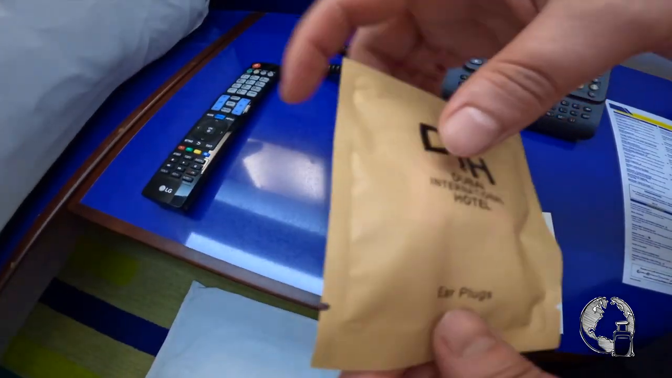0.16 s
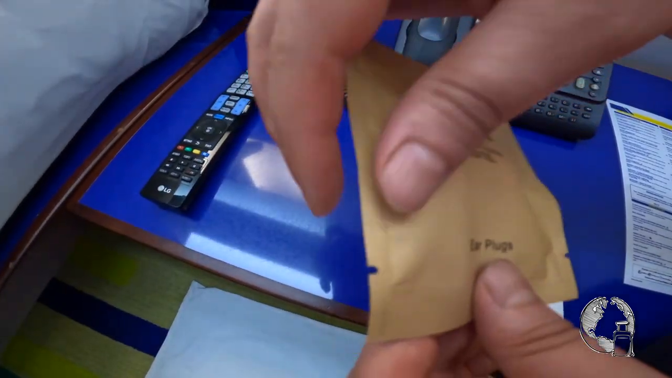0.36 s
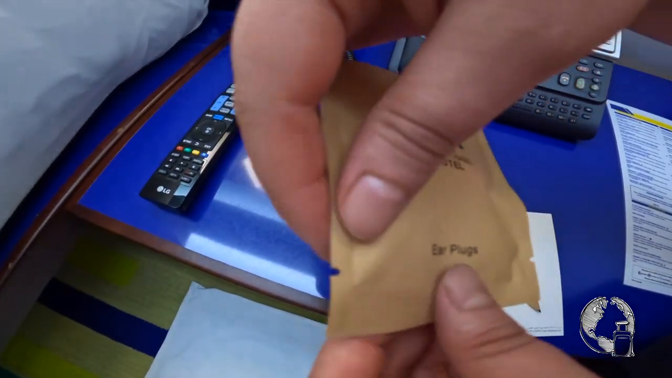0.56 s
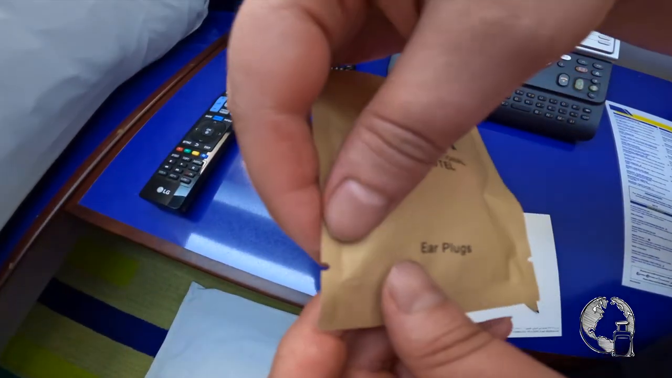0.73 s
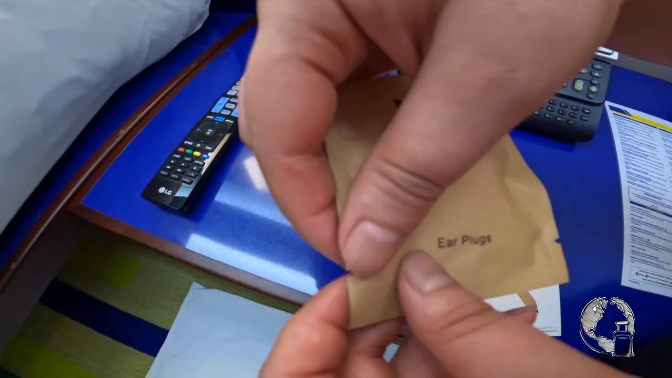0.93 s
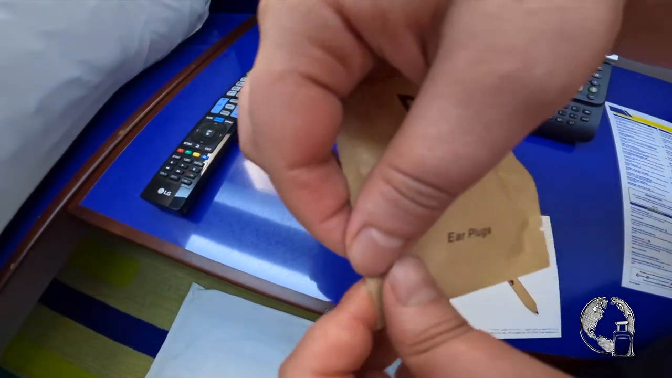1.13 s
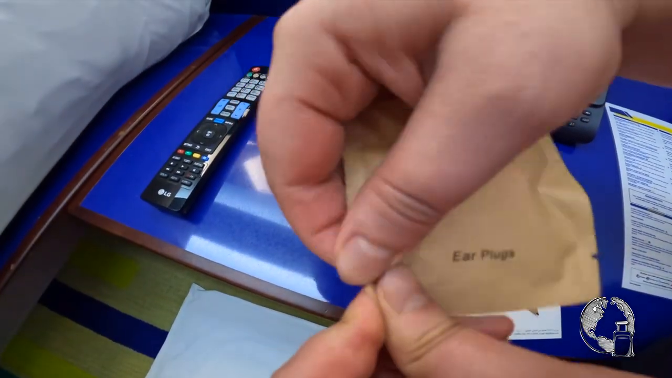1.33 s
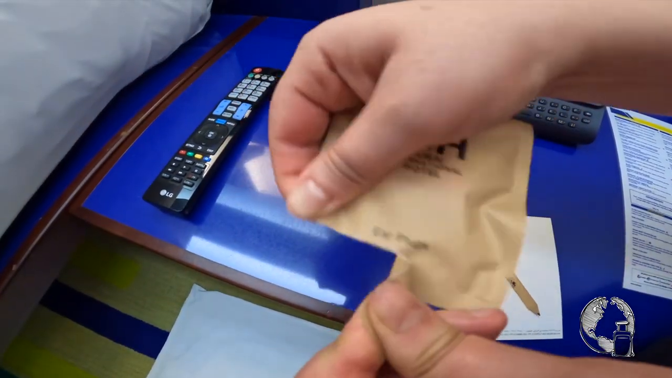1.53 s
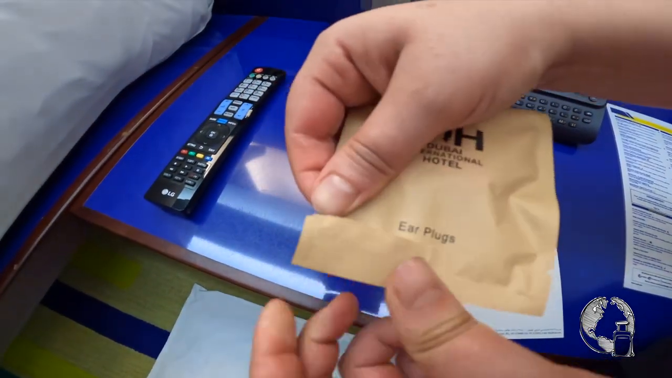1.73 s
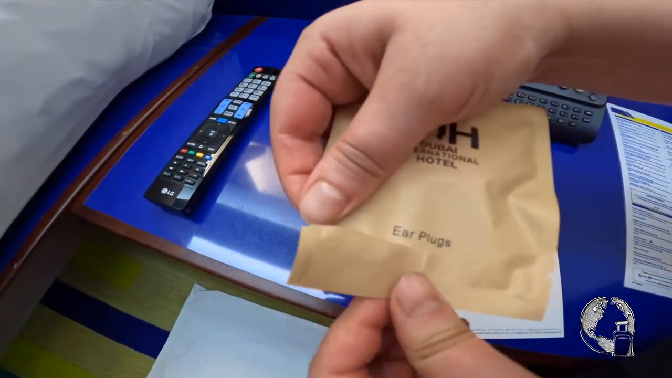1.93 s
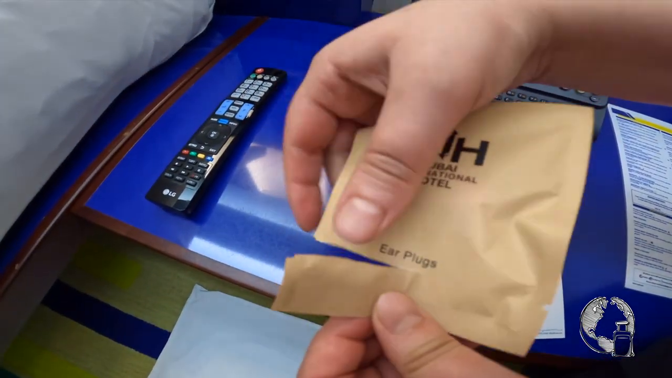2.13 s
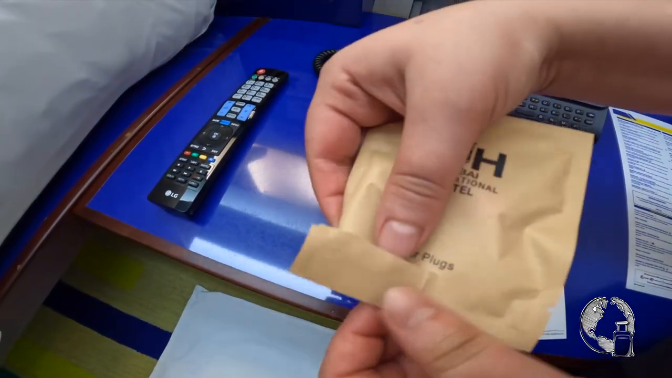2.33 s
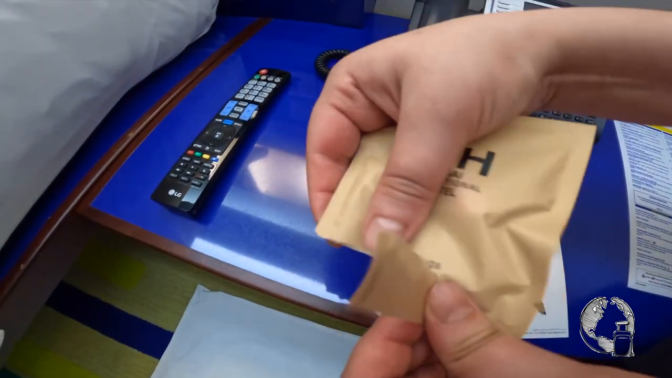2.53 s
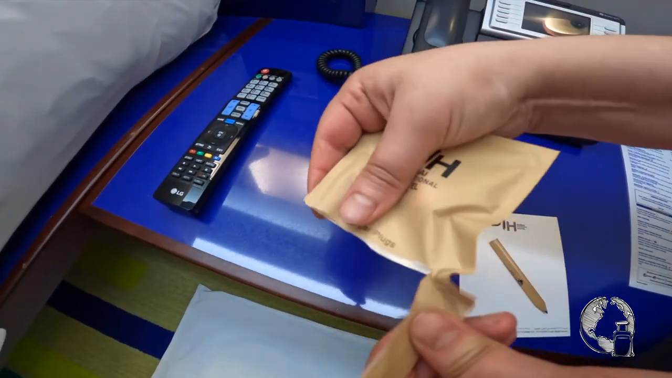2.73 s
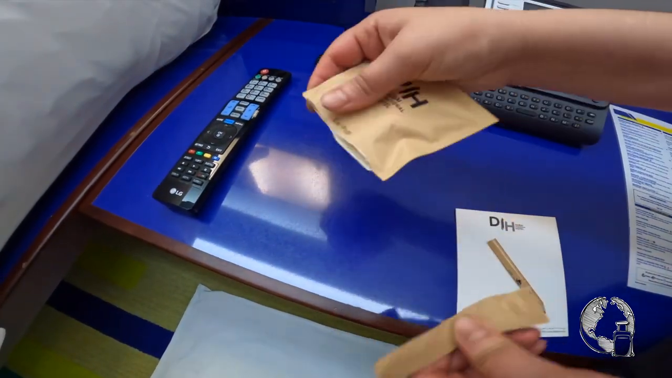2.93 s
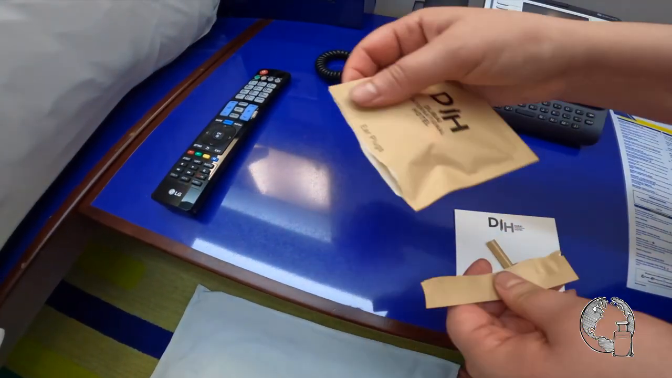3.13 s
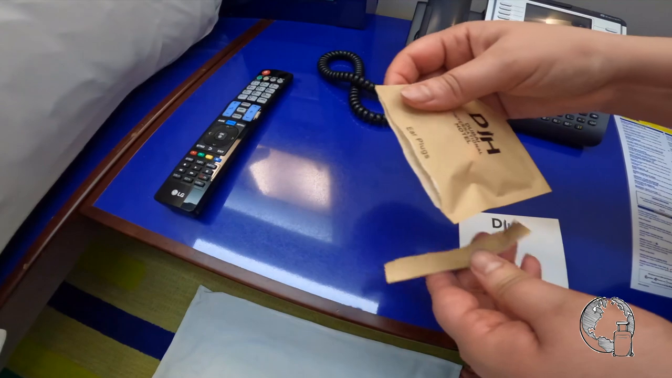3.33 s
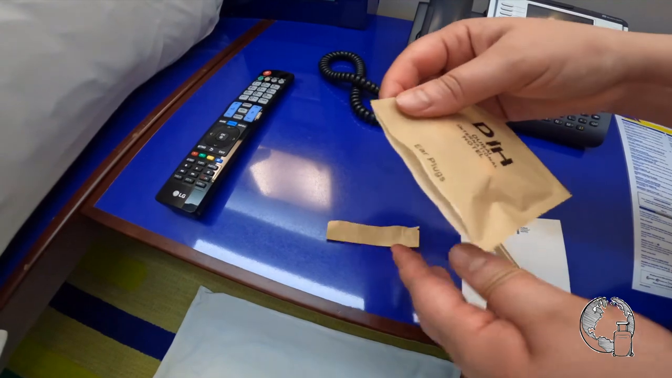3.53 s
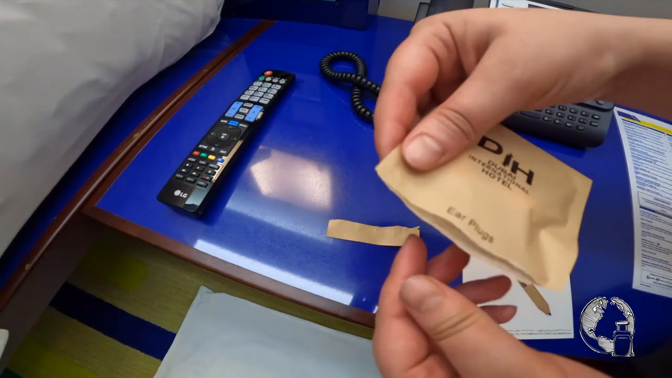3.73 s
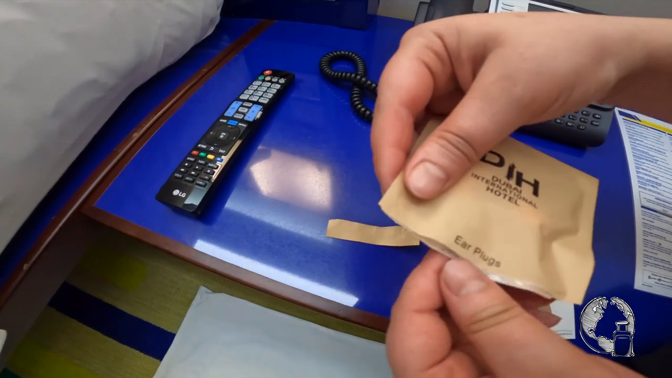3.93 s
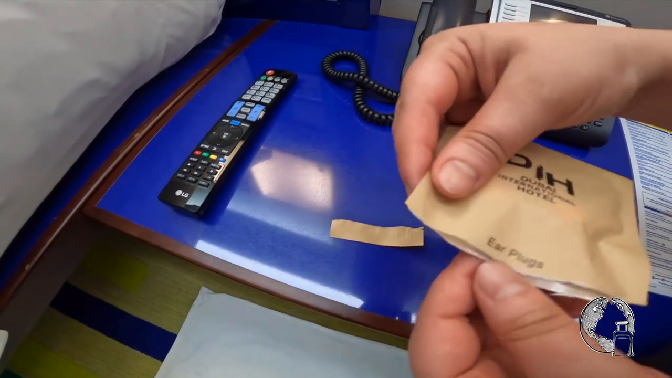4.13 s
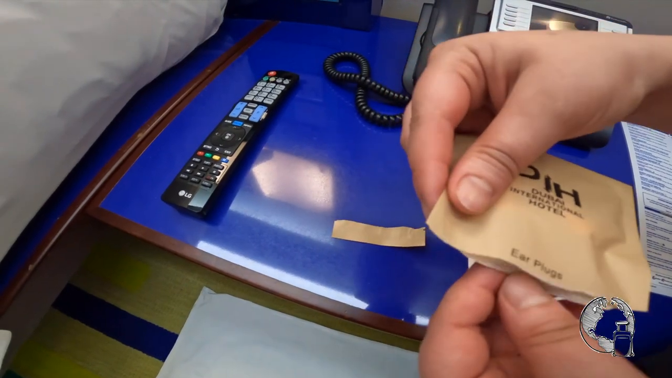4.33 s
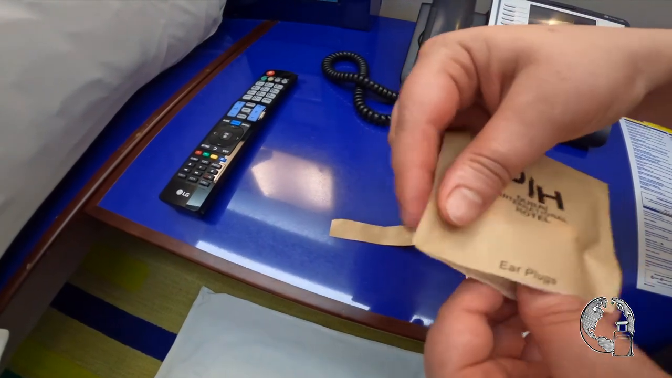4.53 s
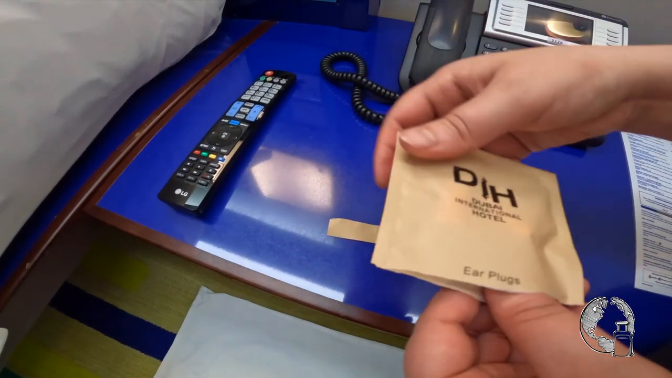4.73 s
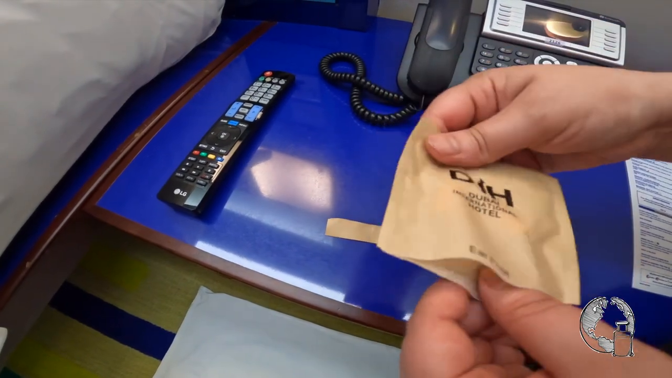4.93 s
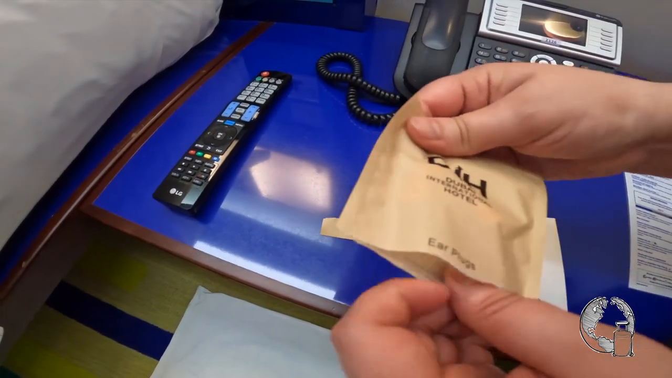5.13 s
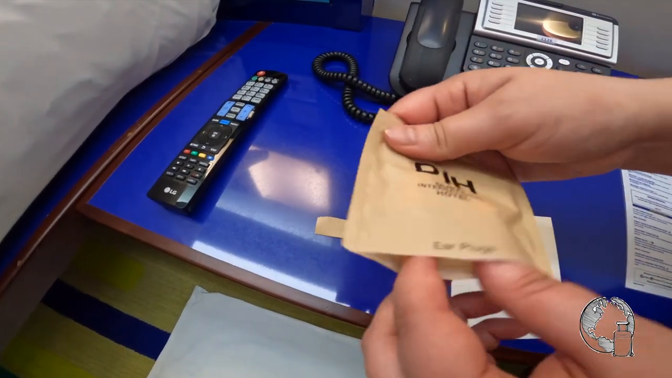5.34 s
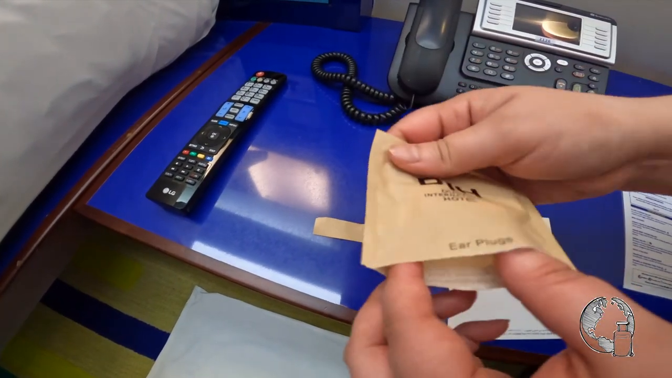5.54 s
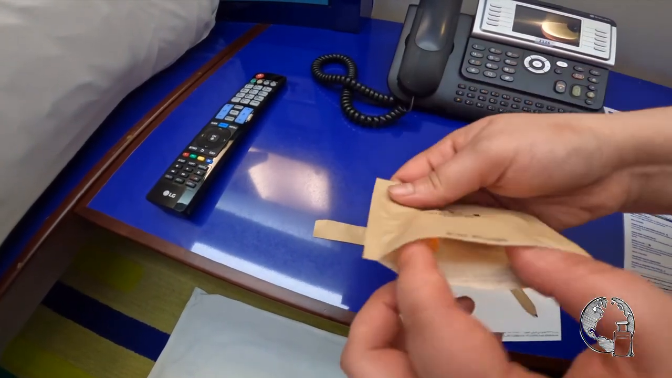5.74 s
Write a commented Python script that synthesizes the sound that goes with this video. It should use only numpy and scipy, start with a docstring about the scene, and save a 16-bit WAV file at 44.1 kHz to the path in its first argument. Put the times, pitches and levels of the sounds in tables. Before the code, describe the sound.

A small stiff paper sachet is handled very close to the microphones. Sparse sharp crinkles come first, then a brisk short rip, a cluster of crackles, and another quick two-part tear. Lighter rubbing and isolated snaps follow, with a denser burst as the opening is pried apart. The room is soft, quiet and nearly dry, with a low ventilation rumble.

```python
"""Stiff paper snaps sharply and rasps as hands pinch, tear and prise open a small sachet close by.
Snaps are noise-driven facets with ringing modes; tearing and sliding are dense streams of tiny clicks.
The pouch puffs air as damped swings of falling pitch; runs of fine creases crackle.
Desk and wall reflections and the low filtered-noise rumble of a quiet, softly furnished room lie behind."""
import sys
import numpy as np
from scipy import signal
from scipy.fft import rfft, irfft, next_fast_len
from scipy.io import wavfile

SR = 44100
rng = np.random.default_rng(int(sys.argv[2]) if len(sys.argv) > 2 else 0)


def put_to_file(sound):
    """Save the sound as 16-bit audio at rate SR, in the file named by the first command-line argument."""
    columns = np.atleast_2d(sound).T  # one column per channel
    safe = np.clip(columns, -1, 1)
    whole_steps = np.round(safe * 32767)
    wavfile.write(sys.argv[1], SR, whole_steps.astype(np.int16))


N = 258867

TAPS = 2048
LEAD = TAPS // 10  # samples of creak before a facet flips
HZ = np.fft.rfftfreq(TAPS, 1 / SR) + 1  # offset keeps logs and ratios finite
LOWEST_HZ = 471  # reference lowest mode of a facet
HOLD_DB = -80  # creep of fingers that only hold the paper

# Pulls that tear the paper or peel the lips of the pouch apart. Each row: start in seconds, length in
# seconds, onset level in dB, speed (1 is a brisk rip), ring of the taut paper in Hz.
PULLS = [(1.565, 0.11, -41.5, 0.78, 4450), (1.796, 0.018, -52, 0.15, 490),
         (2.648, 0.043, -39.5, 0.89, 1750), (2.853, 0.027, -43, 0.66, 1150)]
# Strokes of skin over paper. Each row: start in seconds, length in seconds, onset level in dB,
# ring of the patch under the finger in Hz.
STROKES = [(0, 0.017, -65, 6650), (0.092, 0.11, -71, 4000), (0.478, 0.041, -66, 6600),
           (0.65, 0.039, -70, 6060), (0.716, 0.15, -66, 5900), (0.903, 0.087, -68.5, 2980),
           (1.081, 0.061, -65, 6500), (1.382, 0.3, -62, 4500), (2.118, 0.016, -58, 3200),
           (2.363, 0.046, -62, 2470), (2.494, 0.094, -62, 2790), (2.72, 0.016, -68.5, 4000),
           (2.838, 0.33, -68, 2720), (3.446, 0.12, -69.5, 2940), (3.852, 0.02, -70.5, 3400),
           (4.174, 0.14, -71, 3200), (4.465, 0.065, -67, 5640), (4.539, 0.024, -63, 5800),
           (4.615, 0.087, -60, 2560), (4.861, 0.066, -73, 7000), (4.995, 0.14, -63.5, 3000),
           (5.28, 0.15, -70.5, 4300), (5.431, 0.08, -62.5, 2520), (5.62, 0.37, -72, 3430)]


def from_db(db):
    """Decibels to amplitude."""
    return 10 ** (np.asarray(db) / 20)


def unit(x):
    """Scales to rms 1."""
    return x / np.sqrt(np.mean(x ** 2) + 1e-20)


def read(points, hz):
    """Interpolates a curve on a log-frequency axis."""
    point_hz, value = np.transpose(points)
    return np.interp(np.log(hz + 1), np.log(point_hz), value)


def add(mix, start_s, sound):
    """Adds a sound in place, cut off at the end of the mix."""
    part = mix[max(round(start_s * SR), 0):][:len(sound)]
    part += sound[:len(part)]


def click(gain):
    """Minimum-phase pulse: the sharpest causal pulse with this spectrum, energy 1."""
    log_gain = np.log(np.maximum(gain / gain.max(), 1e-5))
    circle = np.r_[log_gain, log_gain[-2:0:-1]]
    pulse = np.fft.ifft(np.exp(np.conj(signal.hilbert(circle)))).real
    return pulse / np.linalg.norm(pulse)


def mode(hz, sharpness, lift_db):
    """Spectrum of one resonance standing out of a flat floor."""
    detuning = sharpness * (HZ / hz - hz / HZ)
    return np.sqrt(1 + from_db(lift_db) ** 2 / (1 + detuning ** 2))


def resonate(x, hz, width_hz):
    """Resonance of gain 1 that follows the curve hz: shift to 0 Hz, smooth, shift back."""
    turn = np.exp(2j * np.pi * np.cumsum(hz) / SR)
    pole = np.exp(-np.pi * width_hz / SR)
    return 2 * (turn * signal.lfilter([1 - pole], [1, -pole], x / turn)).real


def flutter(per_s):
    """Smooth chance, rms 1, no faster than the given rate."""
    knots = rng.standard_normal(int(2 * per_s * N / SR) + 2)
    return unit(signal.resample(knots, next_fast_len(N))[:N])


def gesture(start_s, length_s, level_db, rise, sag, fall):
    """Gain of one hand movement: sets in, sags while it lasts, dies away; rates in dB per second."""
    t = np.arange(N) / SR - start_s
    rise_db = rise * np.minimum(t, 0)
    sag_db = sag * np.clip(t, 0, length_s)
    fall_db = fall * np.maximum(t - length_s, 0)
    return from_db(level_db + rise_db - sag_db - fall_db)


def facet(lowest_hz, ring_hz, crispness, decay_ms, scatter=1.19, creak_s=0.00041):
    """A facet creaks and flips, then bending waves rattle between creases; weak below its lowest mode."""
    # Snap spectrum. Each row: frequency in Hz, level in dB per Hz.
    snap_spectrum = [(400, -2), (800, -2), (1600, -3.5), (3100, -5), (6200, -7.5), (8200, -19.5),
                     (10500, -18.5), (14000, -30)]
    t = (np.arange(TAPS) - LEAD) / SR
    envelope = np.exp(np.minimum(t / creak_s, -t * 10 ** 3 / max(decay_ms, .5)))
    rattle = rng.standard_normal(TAPS) * envelope
    drive = scatter * rattle / np.linalg.norm(rattle)
    drive[LEAD] = rng.choice([-1, 1])  # the flip
    tilt_db = crispness * np.log2(np.maximum(HZ, lowest_hz / 2))
    gain = from_db(read(snap_spectrum, HZ) + tilt_db)
    gain = gain * mode(ring_hz, sharpness=5.05, lift_db=10.5) / np.hypot(1, (lowest_hz / HZ) ** 2)
    sound = signal.fftconvolve(drive, click(gain))
    return sound / np.linalg.norm(sound) * np.sqrt(SR / 10 ** 3)  # energy of rms 1 over 1 ms


def snaps(nudge_db=-19, nudge_hz=330, nudge_s=0.0078):
    """Large creases buckle one by one; each also nudges the whole sheet into a soft low knock."""
    # Each row: flip time in seconds, level in dB over 1 ms, ringing mode in Hz,
    # crispness in dB per octave, decay in ms (facet takes 0.5 at least).
    large_creases = [(0.1366, -33.0, 4000, -6.5, 0.99), (0.1532, -32.5, 2590, -6, 1.2),
                     (0.1978, -29, 5860, -7.5, 1.7), (0.217, -37.5, 990, -3, 2.2),
                     (0.238, -30.0, 6650, -2.5, 1.1), (0.3395, -39, 1100, -8.5, 3.2),
                     (0.4494, -31, 6700, -2, 1.2), (0.552, -32, 3950, -21, 0.86),
                     (0.5966, -32, 3130, -2, 2.8), (0.8058, -35.5, 2750, -8.5, 1.3),
                     (0.845, -41.5, 1850, -4.5, 1.5), (0.8794, -35, 4000, -0.5, 0.35),
                     (1.0374, -44.5, 1890, -10.5, 1.4), (1.081, -42, 584, -8, 4.4),
                     (1.146, -27, 790, -2.5, 2.7), (1.1681, -39, 1150, -1, 2.8),
                     (1.2234, -37.5, 554, -2, 3), (1.254, -45.5, 3980, -7.5, 1),
                     (1.307, -32.5, 1750, 0, 3.0), (1.3181, -39.5, 1700.0, -6, 1.3),
                     (1.3515, -32, 3440.0, -8, 2.5), (1.4458, -29.5, 1310, 0.0, 0.61),
                     (1.497, -30, 1380, 0, 0.31), (1.506, -31, 1750, -2, 2.9),
                     (1.5174, -35, 1630, -5, 0.58), (1.5878, -24.5, 4650, 0, 1.1),
                     (1.604, -41, 2780, -6, 0.6), (1.633, -31, 4620, -5, 4.3),
                     (1.6595, -35, 4550, -3.5, 1.7), (1.8202, -34.5, 4160, 2.5, 0.87),
                     (1.828, -39.5, 604, -0.5, 2.4), (2.018, -54, 1720, -4.5, 1.4),
                     (2.0891, -43.5, 890, -3, 1.5), (2.0945, -37, 3440, -2.5, 3.4),
                     (2.117, -36, 5700, -1.5, 0.54), (2.1206, -40.5, 1600, -7, 1.8),
                     (2.131, -44, 1080, -1.5, 1.1), (2.299, -33.5, 680, 0, 1.3),
                     (2.3103, -34, 6600, -6.5, 1.4), (2.3319, -28, 1620, 3, 3.5),
                     (2.3673, -33, 2900, -3, 3.2), (2.3782, -35.5, 3830, -7, 1.4),
                     (2.3929, -28, 830, -0.5, 1.3), (2.4079, -32.5, 720, -0.5, 1.8),
                     (2.4241, -36, 3260, -5, 1.7), (2.527, -35.5, 3250, -7, 1.4),
                     (2.5516, -40, 1220, -19, 0.44), (2.5712, -38.5, 900, 5.5, 1.4),
                     (2.6449, -30, 1880, 3, 0.84), (2.6856, -31, 1950, -1.5, 0.83),
                     (2.6953, -33.5, 3600, -1, 1.2), (2.7672, -43, 1900, -4.5, 0.43),
                     (2.825, -28, 3300, 2.5, 0.68), (2.9047, -36.5, 1640, 0, 1),
                     (2.98, -46, 1920, 0.5, 1.7), (3.003, -33, 2680, -0.5, 3.2),
                     (3.02, -39.5, 2120, -2, 4.5), (3.0554, -37, 2440, -2, 1),
                     (3.0645, -35.5, 4000, -3, 1.6), (3.092, -43.5, 960, -4.5, 2.6),
                     (3.1424, -32.0, 3370, 0, 1.06), (3.422, -44.5, 1220, -1.5, 2.5),
                     (3.461, -30, 3900, 3.5, 1.7), (3.5173, -37, 3300, 4.5, 2),
                     (3.601, -46.5, 1590, 3.5, 9.2), (3.6992, -46.5, 5000, -7, 1.9),
                     (3.8353, -32.5, 5400, 4, 1), (3.8607, -43.5, 1370, -1, 9.3),
                     (4.171, -29.5, 5440, 3, 0.39), (4.316, -39.5, 605, 2.5, 2.2),
                     (4.584, -31.5, 1420, 1, 2.4), (4.6147, -32, 3950, -0.5, 3.6),
                     (4.661, -36.5, 2670, 1.5, 1.3), (4.759, -48.5, 1910, -11, 1.2),
                     (4.9135, -43, 4930, -11, 0.45), (4.9467, -33, 2020, -1, 5.5),
                     (5.0104, -31, 3500, -4, 1.9), (5.0169, -28, 4500, 0.5, 1.2),
                     (5.039, -27.5, 4270, 2.5, 0.53), (5.0627, -38.5, 2760, -1, 1.1),
                     (5.1004, -40.5, 2100, -4, 1.2), (5.1118, -31, 2700, 0.5, 1.4),
                     (5.136, -27, 2050, -4, 2.2), (5.1467, -29, 3550, 1, 3.1), (5.152, -34, 890, 6, 0.43),
                     (5.2286, -41.5, 3340, -4.5, 3.7), (5.3017, -34, 1570, -5, 6.3),
                     (5.339, -33, 4900, -0.5, 2.6), (5.409, -38, 4930, -4, 2.1),
                     (5.4814, -35, 2180, -15, 1.7), (5.512, -38, 3150, 4.5, 1), (5.683, -48.5, 1270, -7, 2),
                     (5.809, -35.5, 3320, 3.5, 1.15)]
    at_ring_hz, lowest_slope, octaves_per_crispness = 2100, 0.43, 0.14
    out, t = np.zeros(N), np.arange(TAPS) / SR
    for flip_s, db, ring_hz, crispness, decay_ms in large_creases:
        # The lowest mode rises with the ringing mode; a soft snap stirs less of the sheet.
        lowest_hz = LOWEST_HZ * (ring_hz / at_ring_hz) ** lowest_slope
        lowest_hz = lowest_hz * 2 ** (-octaves_per_crispness * crispness)
        knock_hz = nudge_hz * 2 ** rng.uniform(-1.15, 0.615)
        knock = np.sin(2 * np.pi * knock_hz * t) * np.exp(-t / nudge_s)
        add(out, flip_s - LEAD / SR, from_db(db) * facet(lowest_hz, ring_hz, crispness, decay_ms))
        add(out, flip_s, from_db(db + nudge_db) * knock)
    return out


def grains(colour, per_s, spread_db, lift_db, drift_db, drift_hz, count=12):
    """Dense tiny clicks of uneven size, each ringing one of several patches that take turns to lead."""
    sizes = from_db(spread_db * np.minimum(rng.exponential(1, N), 4)) * rng.choice([-1, 1], N)
    sizes = sizes * (rng.random(N) < per_s / SR)
    patch, out = rng.integers(0, count, N), np.zeros(N)
    for k, hz in enumerate(np.geomspace(900, 9000, count)):
        ring = click(from_db(read(colour, HZ)) * mode(hz, sharpness=4.2, lift_db=lift_db))
        rung = signal.oaconvolve(sizes * (patch == k), ring)[:N]
        out += rung * from_db(drift_db * flutter(drift_hz))
    return unit(out)


def tear(fibres_per_s=7500, stick_slip_db=3.5, slips_per_s=130, brightening=0.93):
    """Fibres break in jerks and ring the taut paper; a slower pull crackles sparser and duller."""
    # Each row: frequency in Hz, level in dB per Hz.
    tear_spectrum = [(60, 3), (240, 6), (650, -7), (1600, 1.5), (2800, -4.5), (5000, -6.5), (6700, -5.5),
                     (8600, -17), (10800, -8), (14000, -22.5)]
    gains = np.array([gesture(*row[:3], rise=2403, sag=30, fall=613) for row in PULLS])
    # The strongest pull at each moment sets the click rate.
    per_s = fibres_per_s * np.array(PULLS)[gains.argmax(axis=0), 3]
    fibres = grains(tear_spectrum, per_s, spread_db=4.5, lift_db=11.5, drift_db=2.5, drift_hz=70.0)
    fibres = fibres * from_db(stick_slip_db * flutter(slips_per_s))
    out = np.zeros(N)
    for gain, (start_s, length_s, _, speed, ring_hz) in zip(gains, PULLS):
        tilt = from_db(brightening * np.log2(speed) * np.log2(np.maximum(HZ, 400)))
        ring = click(tilt * mode(ring_hz, sharpness=3.3, lift_db=4.5))
        rasp = signal.oaconvolve(fibres, ring)[:N]
        during_pull = rasp[int(start_s * SR):int((start_s + length_s) * SR)]
        out += gain * rasp / during_pull.std()
    return out


def crackle(start_s, length_s, level_db, ring_hz, per_s, spread_db=1.0, scatter_octaves=0.52,
            crispness=-3, decay_ms=2.8):
    """A run of small facets gives way at uneven moments, each with its own size and pitch."""
    out = np.zeros(N)
    for when, size, pitch in rng.random((round(length_s * per_s), 3)):
        hz = ring_hz * 2 ** (scatter_octaves * (2 * pitch - 1))
        db = level_db + spread_db * (2 * size - 1)
        snap = from_db(db) * facet(LOWEST_HZ, hz, crispness, decay_ms)
        add(out, start_s + when * length_s - LEAD / SR, snap)
    return out


def bundles(over_pull_db=4.0, per_s=90):
    """Whole bundles of fibres hold the tear back, then crack at once."""
    return sum(crackle(start_s, length_s, db + over_pull_db, ring_hz, per_s)
               for start_s, length_s, db, _, ring_hz in PULLS)


def puffs(cycles=1.0, slackening=0.76):
    """The pouch jerks taut, goes slack and pushes air: a heavily damped swing whose pitch falls."""
    # Each row: start in seconds, swing amplitude in dB before damping.
    flexes = [(0.068, -43), (0.125, -44), (0.2, -35.5), (0.665, -44.5), (1.023, -42), (1.111, -43.5),
              (1.172, -38), (1.449, -36), (1.589, -25.5), (1.637, -29.5), (1.791, -39), (2.338, -37),
              (2.407, -38.5), (2.857, -33.5), (2.885, -29.5), (4.32, -39), (5.041, -35.5), (5.137, -31),
              (5.477, -35.5)]
    # A stronger flex moves more of the pouch and sounds lower.
    base_hz, base_db, db_per_octave = 199, -35, 10
    out, t = np.zeros(N), np.arange(2 * TAPS) / SR
    for start_s, db in flexes:
        age = t * base_hz * 2 ** ((base_db - db) / db_per_octave)
        # Pitch glides from 1.36 to 0.6 times the scaled base.
        turns = 0.6 * age + slackening * (1 - np.exp(-2 * age)) / 2
        add(out, start_s, -from_db(db) * np.sin(2 * np.pi * turns) * np.exp(-age / cycles))
    return out


def squeezes(creases_per_s=200):
    """The paper crumples finely under the fingertips."""
    # Each row: start in seconds, length in seconds, level of a crease in dB, ringing mode in Hz.
    crumples = [(0.122, .015, -53.5, 2600), (1.456, .04, -47.5, 1400), (2.616, .022, -46, 3400),
                (4.531, .18, -58, 2930), (5.019, .02, -44, 1100), (5.438, 0.036, -41, 2530)]
    return sum(crackle(*row, creases_per_s) for row in crumples)


def strokes():
    """How hard the fingers rub: one row of gains a stroke."""
    return np.array([gesture(*row[:3], rise=713, sag=1, fall=345) for row in STROKES])


def slide(ridges_per_s=9000, grip_db=2.5, brightening=0.66, neutral_hz=3300, panel_hz=4400,
          wander_octaves=0.29, panel_db=2, hold_db_per_octave=-2.5):
    """Skin ridges catch on the grain and merge into hiss; the panel's ring wanders as it bends."""
    # Each row: frequency in Hz, level in dB per Hz.
    slide_spectrum = [(300, 12.5), (800, -2), (2300, -7), (3500, -5.5), (5600, -7.5), (8700, -15.5),
                      (11000, -9), (14000, -20)]
    hiss = grains(slide_spectrum, ridges_per_s, spread_db=3.5, lift_db=15.0, drift_db=5.5, drift_hz=13)
    ring_curve_hz = panel_hz * 2 ** (wander_octaves * flutter(6.4))
    hiss = hiss + from_db(panel_db) * resonate(hiss, ring_curve_hz, width_hz=510)
    dulling = from_db(hold_db_per_octave * np.log2(np.maximum(HZ, 3000)))
    creep = signal.oaconvolve(hiss, click(dulling))[:N]
    out = from_db(HOLD_DB) * unit(creep)
    for gain, (*_, ring_hz) in zip(strokes(), STROKES):
        # A tauter patch sounds brighter.
        tilt_db = brightening * np.log2(ring_hz / neutral_hz) * np.log2(np.maximum(HZ, LOWEST_HZ))
        ring = click(from_db(tilt_db) * mode(ring_hz, sharpness=0.99, lift_db=2.5))
        out += gain * unit(signal.oaconvolve(hiss, ring)[:N])
    return from_db(grip_db * flutter(17)) * out  # uneven grip


def small_snaps(count=140, level_db=-60, at_work_db=-65, coupling=0.34, spread_db=2.5, decay_ms=2.3,
                crispness=-5):
    """Tiny creases tick at random, louder while the fingers rub."""
    rubbing = strokes().sum(axis=0) + from_db(HOLD_DB)
    out, work = np.zeros(N), (rubbing / from_db(at_work_db)) ** coupling
    for when, size, pitch in rng.random((count, 3)):
        hz = 450 * 8 ** pitch
        db = level_db + spread_db * min(-np.log(size), 2)
        tick = facet(hz / 2, hz, crispness, decay_ms) * from_db(db)
        add(out, when * N / SR, tick * work[int(when * N)])
    return out


def place(x, sway_db=1):
    """Hands a little to the right; balance sways as different faces of the paper radiate."""
    # Left port against right. Each row: frequency in Hz, louder by dB, later by radians.
    ports_table = np.array([(60, -3.5, 0.04), (500, -3, 0.38), (2800, -4.5, 0.76), (9000, -1.5, 0.49)])
    hz = np.fft.rfftfreq(N, 1 / SR)
    lean = from_db(read(ports_table[:, :2], hz) / 2)
    lag = np.exp(-1j * read(ports_table[:, ::2], hz))
    ports = np.array([lean * lag, 1 / lean]) * 2 / (lean + 1 / lean)
    sway = from_db(sway_db * flutter(32))
    return irfft(rfft(x) * ports, N) * np.array([sway, 1 / sway]) * 2 / (sway + 1 / sway)


def reflections(x, desk_db=-22, desk_s=0.0041, wall_db=-26, wall_s=0.014, tail_db=-22, t60_s=0.66):
    """Desk and wall answer early; bed and carpet leave a faint tail, cut at a third of a second."""
    t = np.arange(SR // 3) / SR
    response = 0
    for db, delay_s, decay_s in [(desk_db, desk_s, .008), (wall_db, wall_s, .015), (tail_db, desk_s, t60_s)]:
        decay = np.exp(-np.log(1000) * np.maximum(t - delay_s, 0) / decay_s)  # 60 dB in decay_s
        taps = rng.standard_normal((3, len(t))) * (t > delay_s) * decay
        taps = taps[0] + 0.96 * taps[1:]  # part is shared, part differs between the ports
        response = response + from_db(db) * taps / np.linalg.norm(taps[0])
    response = signal.lfilter(*signal.butter(1, 7000, fs=SR), response)
    return signal.fftconvolve(x[None], response, axes=1)[:, :N]


def room_tone(level_db=-54.5, apart=0.095):
    """Ventilation rumble: shaped noise, almost alike on both sides."""
    # Each row: frequency in Hz, relative level in dB per Hz.
    room_spectrum = [(8, -13.5), (20, -11.5), (55, 3.5), (125, -13), (200, -22.5), (370, -22), (490, -40),
                     (680, -31), (2000, -42), (3200, -70), (14000, -74)]
    hz = np.fft.rfftfreq(N, 1 / SR)
    noise = rfft(rng.standard_normal((2, N)))
    mid, side = unit(irfft(noise * from_db(read(room_spectrum, hz)), N))
    return from_db(level_db) * np.array([mid + apart * side, mid - apart * side])


def scene():
    """Paper just in front of the microphones, its reflections and the quiet room."""
    paper = snaps() + small_snaps() + tear() + slide() + puffs() + bundles() + squeezes()
    return place(paper) + reflections(paper) + room_tone()


def record(dry, edge_hz=14200):
    """Band limit: a linear-phase low-pass."""
    lowpass = signal.firwin(101, edge_hz, window=("kaiser", 8), fs=SR)
    return signal.oaconvolve(dry, lowpass[None], "same")


dry = scene()
out = record(dry)
put_to_file(out)
```